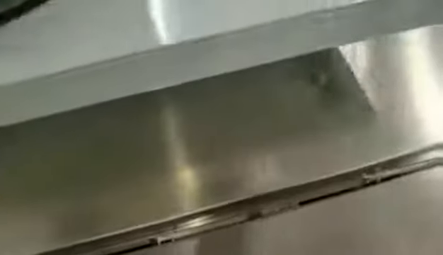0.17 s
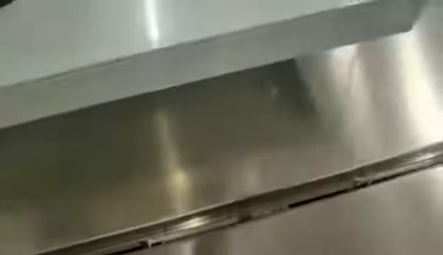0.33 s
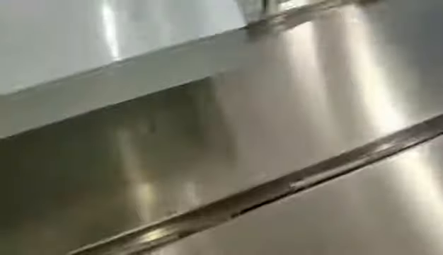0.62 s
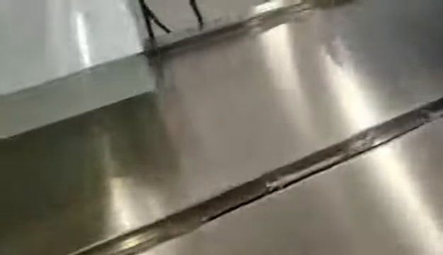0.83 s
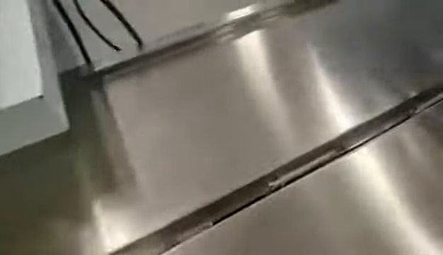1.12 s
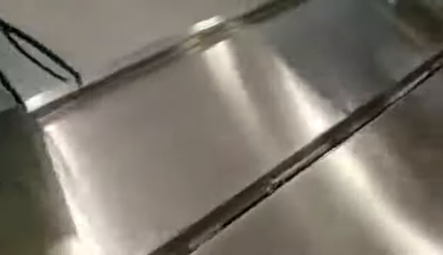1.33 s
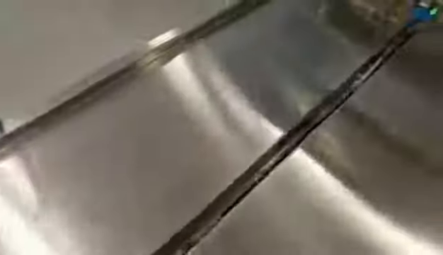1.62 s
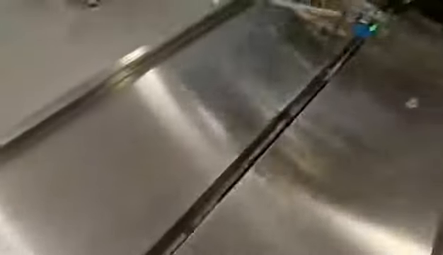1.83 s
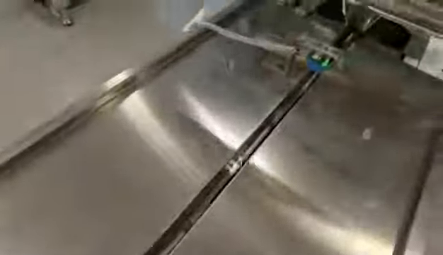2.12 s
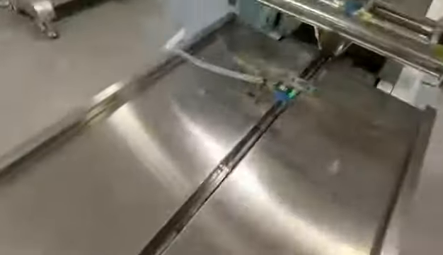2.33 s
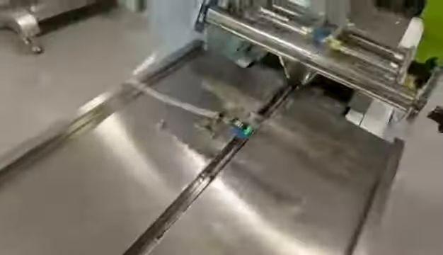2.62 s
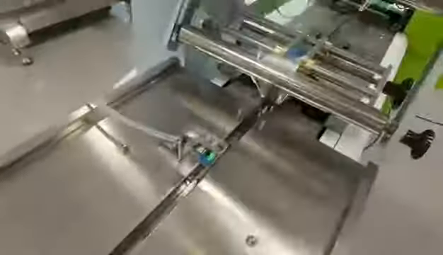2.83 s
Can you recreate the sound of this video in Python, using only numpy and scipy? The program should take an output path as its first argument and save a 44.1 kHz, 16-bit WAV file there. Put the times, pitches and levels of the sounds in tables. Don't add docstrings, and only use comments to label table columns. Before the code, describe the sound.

A packaging machine runs in a workshop: close compressed-air hiss, low motor hum and gear rumble, with metallic thuds and rattles about every three quarters of a second and short exhaust puffs, the hiss receding from a moving hand-held microphone.

```python
import sys
import numpy as np
from scipy import signal
from scipy.fft import rfft, irfft
from scipy.io import wavfile

SR = 44100
rng = np.random.default_rng(int(sys.argv[2]) if len(sys.argv) > 2 else 0)


def amp(db):
    return 10 ** (np.asarray(db, float) / 20)


def write(x):
    x = np.atleast_2d(x).T
    wavfile.write(sys.argv[1], SR, np.round(np.clip(x, -1, 1) * 32767).astype(np.int16))


N = 130977
T = np.arange(N) / SR
HZ = np.fft.rfftfreq(N, 1 / SR) + 1e-3

# [t/s, level/dB]
LEAK_NEARNESS = [(0, -27.5), (.08, -28.5), (.17, -31), (.3, -27.5), (.55, -31.5), (.68, -30.5),
                 (.88, -31.5), (.97, -28.5), (1.2, -30.5), (1.28, -32.5), (1.36, -33.5), (1.48, -32.5),
                 (1.63, -37.5), (1.75, -35), (2.0, -38), (2.4, -36.5), (2.7, -38), (2.97, -35.5)]
# [f/Hz, density/dB]
HISS_COLOUR = [(2000, -4), (2900, -4.5), (3900, -1.5), (4900, -4), (5500, 2), (6000, 4.5), (6800, 3.5),
               (9000, -17)]
# [f/Hz, density/dB]
WHIR_COLOUR = [(320, -36.5), (550, -10.5), (720, -10), (843, -6), (1230, -7.5), (1730, -4.5), (2040, -2.5),
               (2780, -13.5), (3300, -4.5), (4290, -27.5), (7260, -120)]
# [t/s, level/dB]
DRIVE_LOAD = [(0.0, -28.5), (0.12, -32), (0.26, -29), (0.62, -35), (0.73, -29.5), (0.97, -37.5),
              (1.17, -29.5), (1.44, -32), (2.22, -35), (2.46, -33.5), (2.6, -34), (2.97, -32)]
# [f/Hz, density/dB]
RUMBLE_COLOUR = [(20, -10.5), (45, -8), (75, -3.5), (140, 1), (240, -0.5), (340, -6), (480, -13),
                 (700, -16.5)]
# [t/s, harmonics 1 to 4: four levels/dB]
HUM_WALK = [(0.0, -31.5, -98, -29, -43), (0.18, -28, -68, -46, -49), (0.27, -29, -38, -27, -27),
            (0.36, -33.5, -38, -44, -44), (0.43, -30.5, -54, -37.5, -36.5), (0.6, -33, -42.5, -37.5, -34.5),
            (0.91, -37, -36.5, -41.5, -44.5), (0.93, -32.5, -34.5, -37, -29),
            (1.22, -35.5, -41.5, -41, -39.5), (1.35, -39.5, -37, -44.5, -33), (1.5, -36, -29.5, -30, -50),
            (1.62, -42.5, -31, -40, -44), (1.72, -42, -40.5, -52, -39), (1.951, -42.5, -52.5, -62, -43),
            (2.3, -51, -29, -35, -68), (2.41, -47, -36.5, -55, -41.5), (2.66, -49.5, -41, -49, -36.5),
            (2.97, -71, -30.5, -37.5, -41.5)]
# [t/s, level/dB, chatter/s, best-driven f/Hz]
JAW_CONTACTS = [(.004, -29.5, 0.15, 280), (.05, -28.5, 0.033, 740), (.177, -23, 0.022, 246.5),
                (.205, -23.5, .015, 301), (.227, -22.5, .015, 245), (.26, -27.5, 0.0099, 165),
                (.284, -25.5, 0.025, 161), (.425, -46, .029, 200), (.565, -29, 0.042, 199),
                (.705, -31, 0.03, 252), (.738, -29.5, 0.036, 265), (.914, -30.5, 0.024, 276),
                (.942, -17, 0.0087, 220), (.96, -23.5, 0.036, 340), (.993, -22.5, 0.014, 216),
                (1.017, -26, 0.0063, 254), (1.039, -25.5, 0.016, 200), (1.172, -35, 0.01, 200),
                (1.346, -31.5, 0.039, 228), (1.676, -25.5, 0.02, 266), (1.686, -22.5, 0.011, 249),
                (1.702, -21, .012, 271), (1.724, -29.5, 0.016, 300), (1.737, -27, 0.0067, 328),
                (1.771, -30.5, 0.029, 253), (1.828, -31, 0.021, 260), (2.175, -33, 0.025, 250),
                (2.413, -27, 0.016, 253), (2.432, -25, 0.009, 306), (2.441, -16, .008, 261),
                (2.452, -17.5, 0.0096, 336), (2.478, -20, 0.031, 231), (2.52, -24.5, 0.018, 220),
                (2.689, -33.5, 0.18, 241), (2.86, -33.5, .06, 640), (2.885, -33, 0.026, 220),
                (2.92, -29.5, 0.03, 200), (2.95, -40, 0.016, 220)]
# [f/Hz, level/dB, t60/s]
PANEL_MODES = [(144, -6.5, 0.06), (200, -6, 0.17), (220, 0, 0.047), (243.4, 0.5, 0.12), (301, -8.5, 0.14),
               (334, -2.5, 0.19), (360, -6, 0.11), (408.4, -4, 0.16), (451, -9.5, 0.11), (503, -10, 0.1),
               (556, -10, 0.041), (640, -8.5, 0.19), (740, -7.5, 0.06)]
# [t/s, level/dB, chatter/s, best-driven f/Hz]
STEEL_KNOCKS = [(.004, -34.5, .06, 3200), (.177, -29, .03, 2000), (.231, -33.5, 0.033, 1900),
                (.33, -30.5, .03, 1800), (.74, -33.5, 0.034, 2100), (.815, -27, 0.026, 3300),
                (.918, -31, .015, 2500), (.933, -26, 0.019, 2000), (.945, -29, 0.013, 2600),
                (.981, -25.5, 0.016, 1900), (.998, -27, 0.014, 2300), (1.04, -32, 0.024, 2000),
                (1.082, -36, 0.007, 2500), (1.35, -35, 0.032, 2050), (1.668, -36, 0.025, 1900),
                (1.685, -31, 0.072, 1500), (1.722, -34, 0.017, 1700), (1.772, -33.5, 0.038, 2050),
                (1.876, -41.5, 0.014, 2100), (2.404, -38.5, .01, 2100), (2.416, -27.5, 0.021, 2150),
                (2.431, -33.5, 0.0055, 2100), (2.438, -25.5, 0.023, 1900), (2.439, -27.5, 0.034, 2800),
                (2.445, -37, 0.048, 1156), (2.479, -28.5, 0.0096, 1900), (2.494, -30.5, 0.0098, 1900),
                (2.508, -42, .012, 2100), (2.885, -50.5, 0.025, 3500)]
# [f/Hz, level/dB, t60/s]
STEEL_MODES = [(1000, -2, .03), (1246, 6.5, 0.016), (1500, -2.5, 0.074), (1640, -1.5, 0.034),
               (1894, -6.5, .04), (1952, 0, 0.036), (1954, -13, .04), (2047, -5.5, 0.13), (2420, -1, .04),
               (2610, -6, 0.056), (2750, -7, 0.025), (2800, -2.5, 0.089), (3200, -5.5, 0.014),
               (3500, 8, .03)]
# [t/s, level/dB, decay/s]
VALVE_PUFFS = [(.24, -36, 0.088), (.4, -24.5, 0.058), (0.722, -29.5, 0.061), (.806, -23.5, 0.044),
               (.975, -41, .05), (1.058, -26.5, 0.069), (1.24, -35, .03), (1.7, -32, .04),
               (1.819, -34, .03), (1.95, -36, .03), (2.12, -39, .03), (2.45, -28.5, 0.07),
               (2.551, -28, .04), (2.645, -32.5, .02), (2.869, -47, 0.039)]
# [f/Hz, density/dB]
PUFF_COLOUR = [(1200, -36), (3000, -4), (4500, 5), (6000, 19.5), (9000, -13.5)]
# [f/Hz, likeness 0-1]
PORT_LIKENESS = [(60, 1), (300, 0.84), (700, 0.39), (1300, 0.33), (2200, 0.17), (3700, 0.25), (6000, 0.15)]
# [f/Hz, level/dB]
PORT_BALANCE = [(60, -9.5), (160, 3.5), (430, 4.5), (1150, 6.5), (3070, 3), (8220, 4.5)]

PORT_LAG_S, LAG_FROM_HZ = 0.0004055, 910
MAINS_HZ, HUM_WOBBLE_DB = 50.05, 0.8
HUM_TURN = 0.07
CHATTER_PER_S, CHATTER_SPREAD_DB, FIRST_HIT_DB = 400, 3, 3
ROOM_T60_S, ROOM_DB, DIFFUSE_DB = 0.33, -5.5, -1.5
PUFF_ATTACK_S = 0.004


def at_hz(points, hz=HZ):
    table_hz, value = np.transpose(points)
    return np.interp(np.log(hz), np.log(table_hz), value)


def over_time(points):
    return np.interp(T, *np.transpose(points))


def drift(rate):
    knots = int(N / SR * 40) + 2
    path = np.interp(T * np.clip(rate, 0.1, 39), np.arange(knots), rng.standard_normal(knots))
    return path * np.sqrt(1.5)


def unit(x):
    return x / np.sqrt(np.mean(x ** 2) + 1e-20)


def ports(near, left, right):
    alike = np.clip(at_hz(PORT_LIKENESS), 0, 1)
    lag_s = PORT_LAG_S / (1 + (LAG_FROM_HZ / HZ) ** 4)
    late = np.exp(-2j * np.pi * HZ * lag_s)
    tilt = amp(at_hz(PORT_BALANCE) / 2)
    at_left = np.sqrt(alike) * near + np.sqrt(1 - alike) * left
    at_right = np.sqrt(alike) * near * late + np.sqrt(1 - alike) * right
    return np.array([tilt * at_left, at_right / tilt])


def noise(colour, patchy_db, rate):
    low, high = colour[0][0], colour[-1][0]
    edge = 1 / np.sqrt((1 + (low / HZ) ** 8) * (1 + (HZ / high) ** 8))
    both = ports(*rfft(rng.standard_normal((3, N)))) * amp(at_hz(colour)) * edge
    place = 2 * np.log2(HZ / 20)
    together = drift(rate / 2)
    out = 0
    for k in range(18):
        flicker = amp(patchy_db * (0.28 * together + drift(rate)))
        if low / 2 < 20 * 2 ** (k / 2) < min(2 * high, 11000):
            band = both * np.clip(1 - abs(place - k), 0, 1)
            out = out + flicker * irfft(band, N)
    return unit(out)


def air_leak():
    return amp(over_time(LEAK_NEARNESS) + 3.5) * noise(HISS_COLOUR, patchy_db=1.13, rate=25.0)


def gear_whir():
    near_db = over_time(LEAK_NEARNESS)
    level_db = -35 + 0.54 * (near_db - near_db.mean())
    return amp(level_db) * noise(WHIR_COLOUR, patchy_db=2.6, rate=18.0)


def frame_rumble():
    return amp(over_time(DRIVE_LOAD) - 0.5) * noise(RUMBLE_COLOUR, patchy_db=0.5, rate=74.0)


def motor_hum():
    s, *levels = np.transpose(HUM_WALK)
    port_turn = HUM_TURN * np.array([[0], [1]])
    tone = 0
    for harmonic, db in enumerate(levels, 1):
        level = amp(np.interp(T, s, db) + HUM_WOBBLE_DB * drift(12.0))
        turns = harmonic * MAINS_HZ * T + rng.random() - port_turn
        tone = tone + np.sqrt(2) * level * np.sin(2 * np.pi * turns)
    return tone * amp([[3.0], [-4.5]])


def struck(events, modes, band_hz, off_db, touch_s):
    out = np.zeros(N)
    waits = np.cumsum(rng.exponential(1, (len(events), 24)), axis=1)
    waits = (waits - waits[:, :1]) / CHATTER_PER_S
    s, level_db, length, pitch = np.array(events).T[:, :, None]
    at = np.minimum(((s + waits) * SR).astype(int), N - 1)
    size = amp(level_db) * np.exp(-waits / length)
    for hz, db, t60 in modes:
        luck = amp(CHATTER_SPREAD_DB * rng.standard_normal(at.shape)) * rng.choice([-1, 1], at.shape)
        luck[:, 0] = amp(FIRST_HIT_DB)
        drive = amp(db - 5 - off_db * abs(np.log2(hz / pitch)))
        clicks = np.full(N, 1e-18)
        np.add.at(clicks, at, size * luck * drive)
        r, w = amp(-60 / (t60 * SR)), 2 * np.pi * hz / SR
        out += signal.lfilter([0, np.sin(w)], [1, -2 * r * np.cos(w), r * r], clicks)
    touch = np.hanning(max(int(touch_s * SR), 3))
    out = np.convolve(out, touch / touch.sum())[:N]
    return signal.sosfilt(signal.butter(2, band_hz, "band", fs=SR, output="sos"), out)


def workshop(x):
    t = T[:SR // 2]
    tails = rng.standard_normal((3, len(t))) * amp(-60 * t / ROOM_T60_S) * (t > 0.004)
    tails = tails / np.sqrt(np.sum(tails ** 2, axis=1, keepdims=True))
    wet = rfft(signal.fftconvolve(x[None], tails, axes=1)[:, :N])
    direct = rfft(x) / np.sqrt(np.clip(at_hz(PORT_LIKENESS), 0.05, 1))
    return irfft(ports(direct + amp(ROOM_DB) * wet[0], *(amp(DIFFUSE_DB) * wet[1:])), N)


def sealing_jaw():
    panels = struck(JAW_CONTACTS, PANEL_MODES, (140, 900), off_db=10.5, touch_s=0.0014)
    steel = struck(STEEL_KNOCKS, STEEL_MODES, (900, 4000), off_db=19, touch_s=0.0001)
    return workshop(panels + steel)


def valves():
    shape = np.zeros(N)
    for s, db, fall in VALVE_PUFFS:
        since = abs(T - s)
        shape += amp(db) * (T > s) * np.exp(-since / fall) * np.minimum(since / PUFF_ATTACK_S, 1)
    return shape * noise(PUFF_COLOUR, patchy_db=0, rate=30.0)


def scene():
    return air_leak() + gear_whir() + frame_rumble() + motor_hum() + sealing_jaw() + valves()


def top_cut(x):
    return signal.sosfilt(signal.butter(12, 8820, fs=SR, output="sos"), x)


def record(dry):
    return top_cut(dry)


dry = scene()
out = record(dry)
write(out)
```